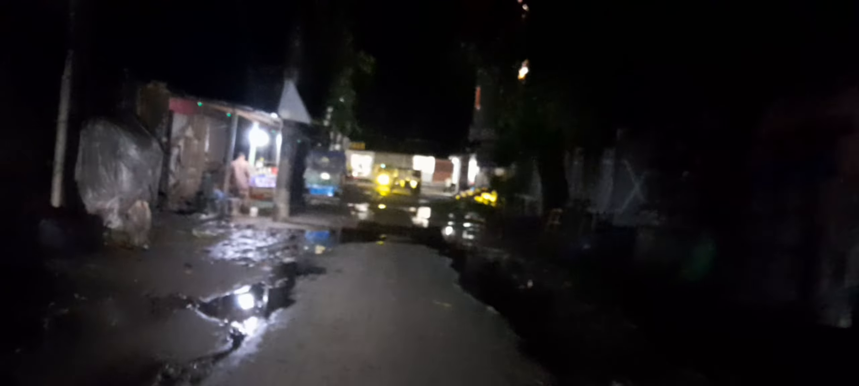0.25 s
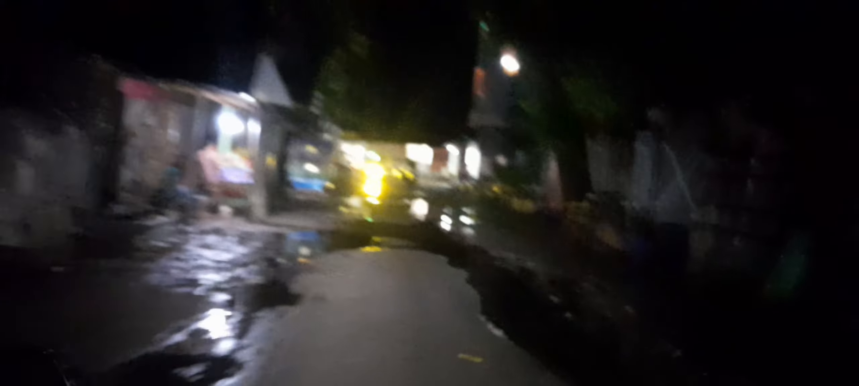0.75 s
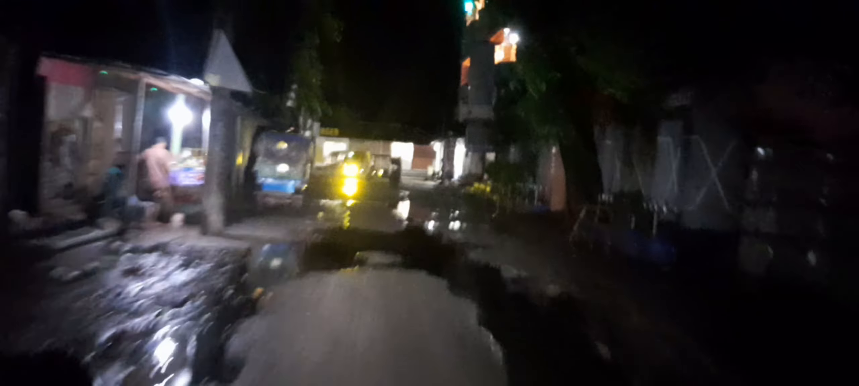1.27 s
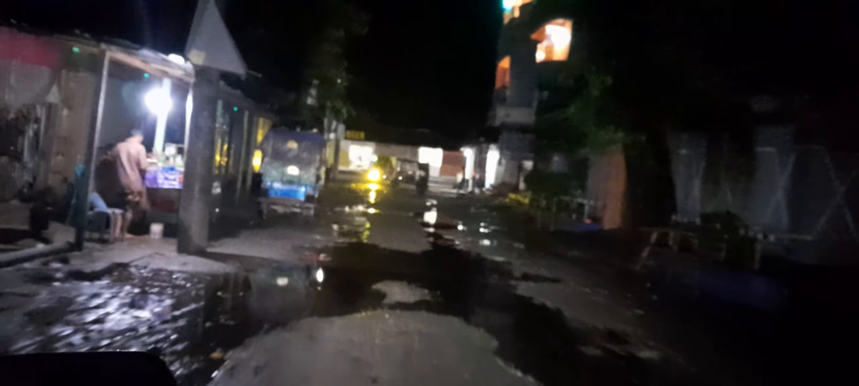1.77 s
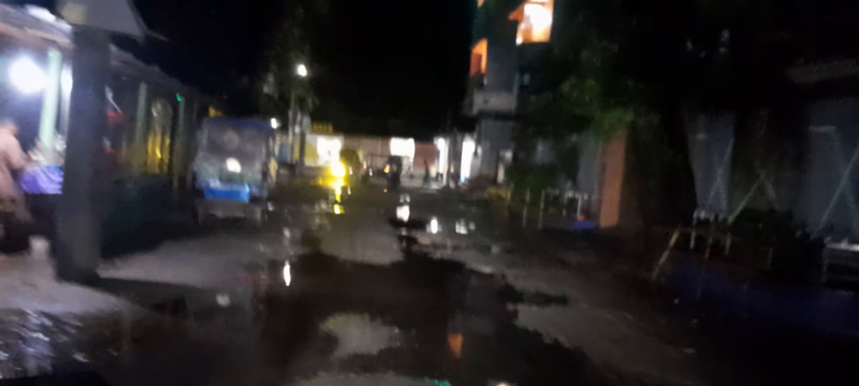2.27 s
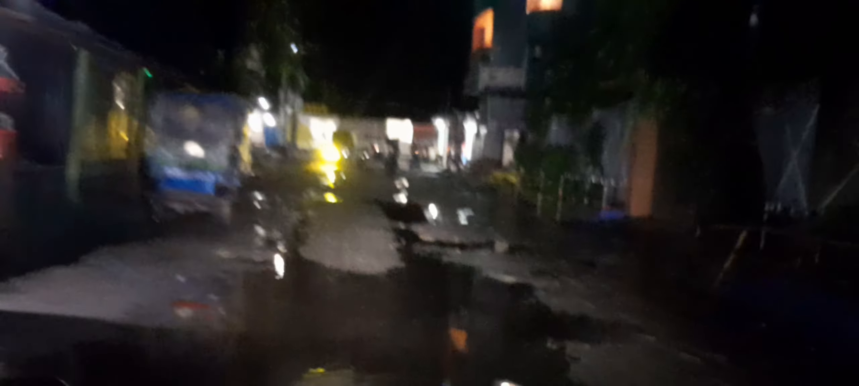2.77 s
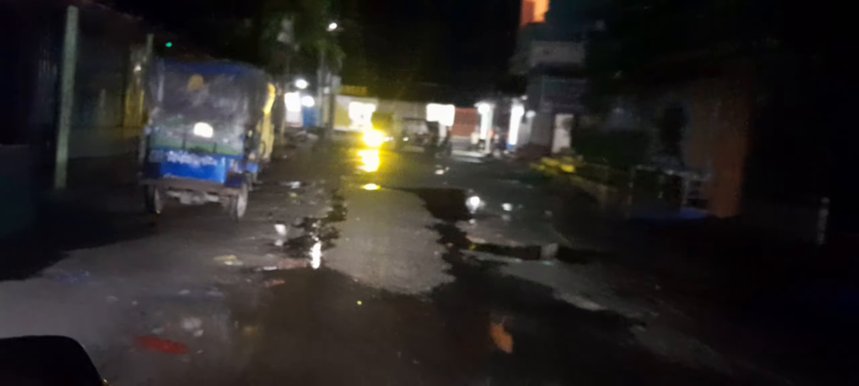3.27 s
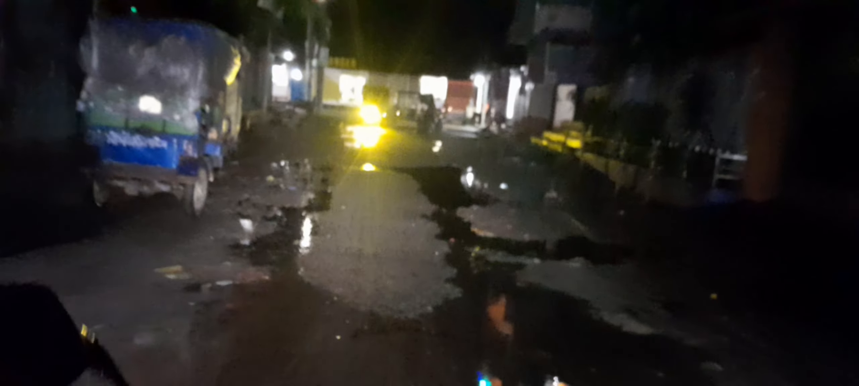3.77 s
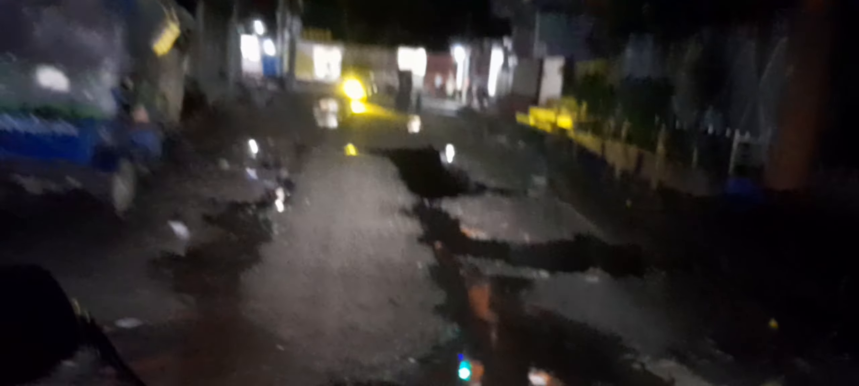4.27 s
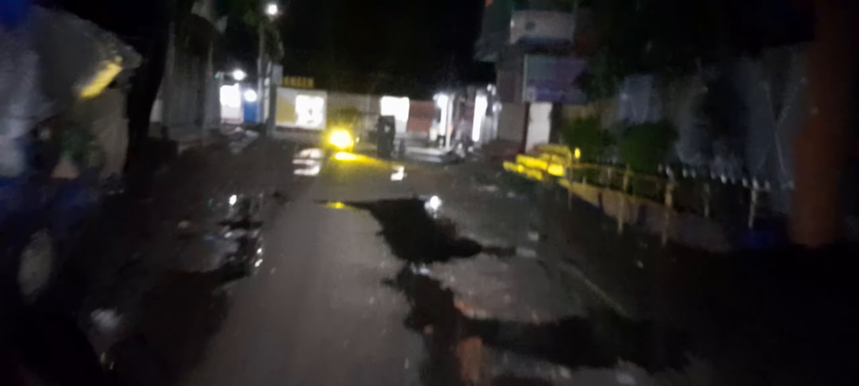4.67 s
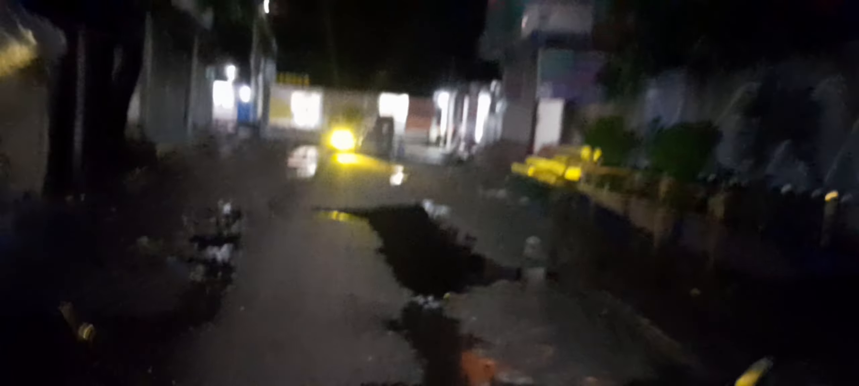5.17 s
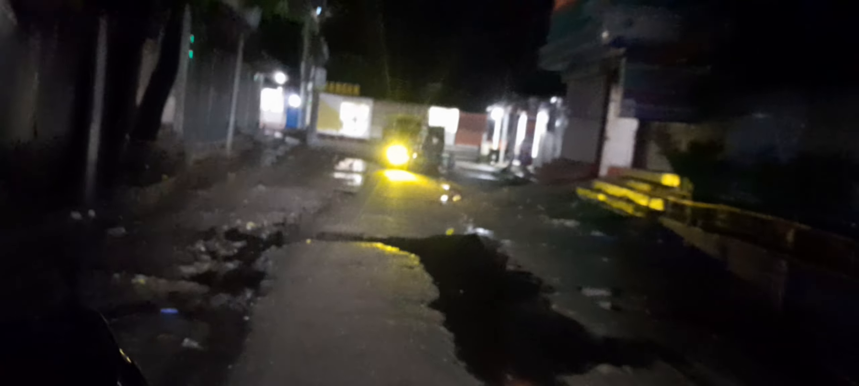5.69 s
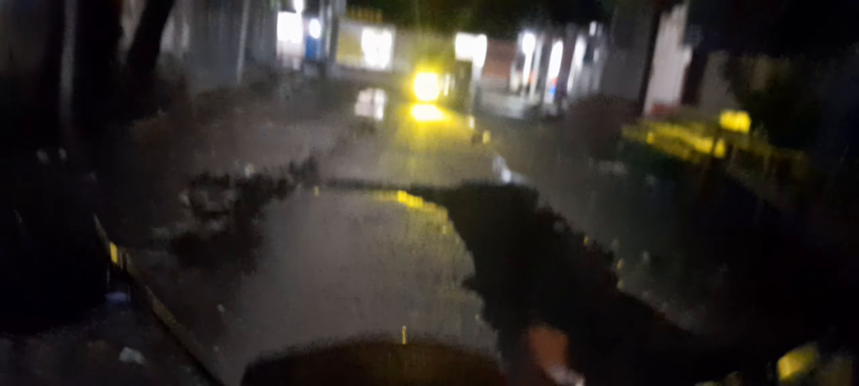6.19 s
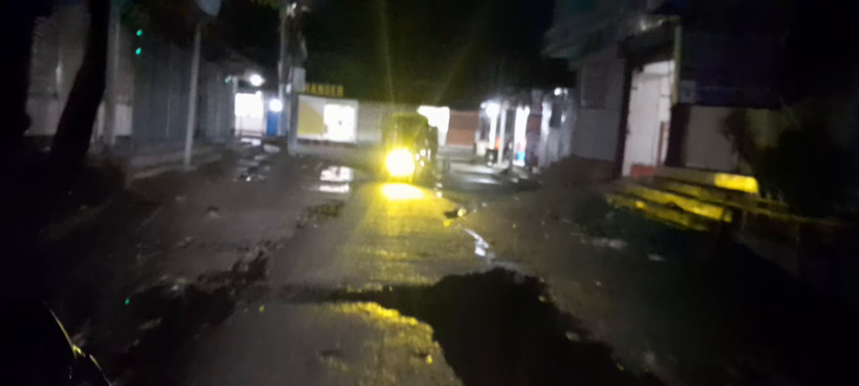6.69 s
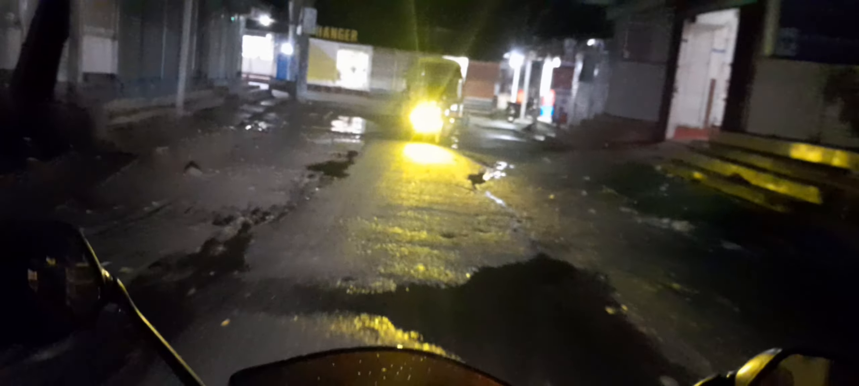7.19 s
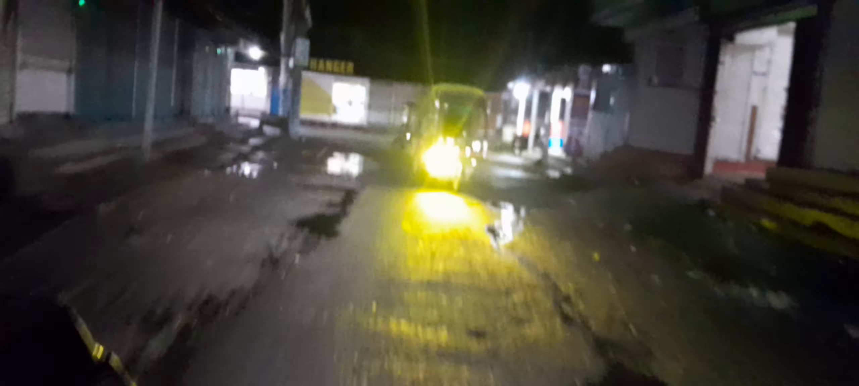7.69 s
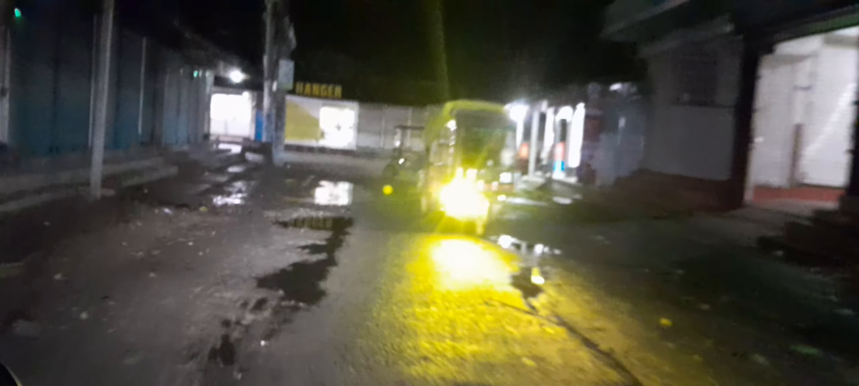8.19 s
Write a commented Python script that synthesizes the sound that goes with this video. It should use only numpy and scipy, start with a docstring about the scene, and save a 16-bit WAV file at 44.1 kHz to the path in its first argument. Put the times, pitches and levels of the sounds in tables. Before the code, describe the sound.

Onboard a small motorcycle: throbbing exhaust, raspy intake and wet hiss, a sharp crack, pothole thuds and rattles, slowing, then revving with a thin squeal.

```python
"""A single-cylinder motorcycle rolls along a wet, bumpy street: shaped noise makes the hiss, rumble and clatter.
At once each firing thumps in the silencer, the intake rasps, gears whine and the chain moans. A crack and its
echo ring out, then potholes jolt the bike, the fairing knocks, the intake whistles and grit ticks.
The engine drops to idle after two seconds and picks up again after four.
Past six seconds a metal part squeals as a wavering tone, joined by a rough chirr of ringing noise."""
import sys
import numpy as np
from scipy import signal
from scipy.fft import rfft, irfft, next_fast_len
from scipy.io import wavfile

SR = 44100
rng = np.random.default_rng(int(sys.argv[2]) if len(sys.argv) > 2 else 0)


def dump_mix(stems):
    """Bounce the given channels to the path in sys.argv[1] as a 16-bit WAV at rate SR."""
    frames = np.atleast_2d(stems).T  # one column per channel
    limited = np.clip(frames, -1, 1)  # hard clip at full scale
    pcm = np.round(limited * 32767).astype(np.int16)
    wavfile.write(sys.argv[1], SR, pcm)


N = 372233
TIME = np.arange(N) / SR   # seconds

# How fast the engine runs: (time [s], speed [firings per s])
ENGINE_SPEED = [(0.0, 20.21), (0.37, 20.48), (0.5, 16.6), (0.87, 15.7), (1.01, 24.6), (1.12, 21.2),
                (1.38, 21.0), (1.75, 15.32), (2.02, 16.23), (2.59, 8.04), (2.9, 10.26), (3.17, 8.78),
                (3.8, 8.82), (4.06, 13.95), (4.93, 16.39), (5.09, 13.71), (5.51, 15.4), (5.93, 13.05),
                (6.25, 23.2), (6.45, 20.8), (6.92, 21.0), (7.08, 23.3), (7.25, 24.5), (7.45, 25.1),
                (7.84, 17.3), (8.2, 14.07), (8.44, 15.0)]
# The rider's hand: (time [s], throttle opening [0-1])
THROTTLE = [(0, 0.56), (.35, 0.42), (.58, 0.09), (.8, 0.56), (1.02, 0.54), (1.38, 0.53), (1.7, 0.37),
            (2.25, 0.17), (2.75, 0.05), (3.2, 0.12), (3.5, 0.58), (3.97, 0.34), (4.3, 0.9), (4.85, 0.81),
            (5.38, 0.83), (5.7, 0.41), (6, 0.52), (6.22, 0.82), (6.85, 0.87), (7.38, 0.74), (8.05, 0.58),
            (8.44, 0.83)]
# Jolts from the road: (time [s], bounces [count], relative thud [dB], relative rattle [dB],
# pitch of the shaken panel [Hz], left over right [dB])
JOLTS = [(0.312, 1, -15.5, -25, 200, -1), (0.337, 2, -19, -27, 260, -15), (.402, 2, -13, -26, 200, -10.5),
         (0.941, 1, -39, -29, 290, 1), (.982, 1, -29, -30, 286, 3), (1.544, 2, -11.5, -23.5, 270, -0.5),
         (1.564, 1, -24, -34, 450, 1), (1.601, 1, -25, -29, 260, 15), (1.694, 1, -29, -34, 220, 12),
         (1.745, 1, -38, -39, 240, 18), (1.799, 1, -40, -29, 440, 13), (1.824, 2, -18.5, -28, 403, 13),
         (1.867, 1, -33, -22.5, 550, 5.5), (1.92, 1, -28, -25.5, 380, 3), (1.95, 1, -40, -32, 343, -4),
         (1.99, 1, -26, -32, 220, -11), (2.035, 1, -30, -35, 600, -2), (2.118, 1, -29, -36, 220, 9),
         (2.4, 1, -30, -34, 190, 4), (2.422, 1, -30, -28, 198, 0.5), (2.63, 2, -33, -37.5, 262, 1),
         (3.282, 1, -29, -33, 260, -4), (4.062, 1, -17.5, -40, 446, -1), (4.249, 1, -15, -36, 290, -3),
         (4.274, 2, -39, -23, 308, 1), (4.652, 1, -27, -37, 574, -3), (4.89, 1, -18, -29, 260, 1),
         (5.088, 1, -28, -28.5, 425, 2), (7.534, 1, -17, -48, 250, 1), (7.569, 1, -14.5, -48, 250, 0),
         (7.609, 1, -10.5, -42, 250, 0)]
# Knocks on the fairing: (time [s], relative clack [dB], relative ring [dB], left over right [dB])
KNOCKS = [(.351, -34, -60, -3), (0.983, -28, -47, 3), (1.552, -30, -52, 0), (1.602, -27.5, -55, -5),
          (1.629, -33, -52, -2), (1.773, -31.5, -58, -2), (1.813, -38, -55, -3), (1.865, -28.5, -45, 2),
          (1.919, -20, -55, -3.5), (2.424, -33, -57, 0), (4.071, -30.5, -45, 4), (4.17, -29, -45, 3),
          (4.28, -27.5, -41, 2), (4.652, -25, -37, 2), (5.085, -30, -45, 0), (7.605, -21.5, -25, 7)]
# A crack in the street and its echo: (time [s], relative snap [dB], relative tail [dB])
CRACKS = [(0.222, -15, -21), (0.453, -28.5, -39.5)]
# Ticks of grit and loose parts: (time [s], relative level [dB], centre of their colour [Hz])
TICKS = [(1.543, -59, 5000), (2.978, -53, 4100), (3.385, -49.5, 2340), (4.279, -51, 5000),
         (5.078, -47, 4500), (5.68, -40, 3380), (6.281, -39.5, 2445), (6.295, -41, 5170),
         (7.733, -41.5, 3900)]
# Swells and sags of the exhaust note: (time of peak [s], half length [s], level change [dB])
EXHAUST_SWELLS = [(.59, .07, -1), (.8, 0.18, 4.5), (1.0, .08, -4), (1.307, 0.2, 4), (1.733, 0.064, -17),
                  (2.866, 0.12, -14), (3.17, 0.082, -12), (3.53, .06, 3), (3.778, 0.056, 3.5),
                  (4.425, 0.1, 7), (4.81, 0.083, 6.5), (5.035, .06, -1), (5.315, .09, 1.5),
                  (5.99, 0.057, -12), (6.192, 0.046, -16), (6.718, 0.53, -7), (8.082, 0.074, -8),
                  (8.264, .12, -0.5)]
# Moan of the chain: (time [s], pitch [Hz], relative level [dB])
CHAIN_MOAN = [(0, 540, -44), (.33, 540, -41), (.5, 540, -100), (4.0, 643, -100), (4.15, 650, -55),
              (4.3, 661, -37.5), (4.55, 641, -40.5), (4.77, 700, -39.5), (4.96, 658, -37.5),
              (5.1, 590, -41.5), (5.45, 575, -42), (5.62, 475, -41), (5.8, 455, -36), (5.95, 520, -45.5),
              (6.2, 505, -42), (6.35, 500, -54), (6.5, 500, -100), (7.65, 520, -100), (7.85, 520, -43.5),
              (8.44, 540, -41)]
# Air whistling past the throttle: (time of peak [s], half length [s], pitch at peak [Hz], relative level [dB])
WHISTLES = [(0.756, .13, 1416, -44.5), (1.002, .08, 1320, -38), (1.09, .07, 1380, -41),
            (1.284, .12, 1406, -43.5), (6.11, .08, 1407, -40), (6.245, .08, 1336, -37),
            (6.435, .07, 1325, -34.5), (6.599, .12, 1313, -36.5), (7.877, .12, 1350, -53)]
# Drones of the frame: (time of peak [s], half length [s], multiple of firing rate [count], level [dB])
DRONES = [(.95, 0.075, 13, -28), (1.33, 0.23, 13, -32.5), (6.296, 0.15, 12, -29), (7.27, 0.34, 12, -28)]
# Steady hum of the frame: (multiple of firing rate [count], relative level [dB])
HUM = [(5, 4.5), (4, -20), (6, -8.5)]
# Loudness of the wet hiss: (time [s], relative level [dB])
HISS_LEVEL = [(0, -37.5), (.2, -38), (.55, -46), (1.02, -38.5), (2.05, -48), (2.7, -51), (3.32, -46.5),
              (3.42, -44.5), (3.95, -45), (4.3, -40), (5.38, -38), (5.95, -42.5), (6.27, -35), (7.4, -36.5),
              (8.05, -40), (8.44, -38.5)]
# Loudness of the squealing metal part: (time [s], relative level [dB])
SQUEAL_LEVEL = [(6.2, -100), (6.33, -50), (6.42, -38.5), (6.59, -48), (6.68, -35), (6.74, -45), (6.84, -34),
                (6.9, -45), (7.0, -29.5), (7.06, -42), (7.17, -47), (7.3, -64), (7.45, -100)]
# Tones of the squeal: (pitch [Hz], relative level [dB])
SQUEAL_MODES = [(3268, -0.5), (2750, -17)]

# Resonances of the silencer, airbox, engine casing, fairing and chirring part:
# (pitch [Hz], width [Hz], relative level [dB])
SILENCER = [(102.3, 44.7, 6), (79.5, 13, -18)]
AIRBOX = [(954, 74, 10.3), (1134, 180, 10), (1318, 198, 7.4), (1385, 440, 1)]
BLOCK_MODES = [(295.6, 75, 3), (477, 115, -0.5), (683, 82, -4.5)]
FAIRING = [(1188, 50, 5.5)]
CHIRR_MODES = [(2870, 140, -0.69), (3030, 120, 5.8), (3430, 400, -2)]

# Noise colours of exhaust rumble, casing clatter, wet hiss, jolt rattle, crack tail (also used for grit),
# crack snap, fairing clack and background: (pitch [Hz], relative level [dB per Hz])
RUMBLE = [(20, -17), (32, -43), (45, 11.5), (70, 18), (110, 16), (150, 14.5), (300, -49)]
BLOCK = [(100, -54), (170, 5.5), (220, 3.5), (300, 3.5), (390, -1), (520, -1), (630, -16), (740, -9),
         (860, -14.5), (1400, -12), (1900, -45), (4000, -71)]
HISS = [(700, 6.5), (1600, 5.5), (2400, 4), (3000, 5), (3700, 8), (4500, 5), (6200, 4), (7500, 3),
        (8400, -8), (11000, -8.5), (13000, -5.5), (16000, -13)]
RATTLE = [(30, -9), (60, 12), (150, 9.5), (210, 8.5), (320, 0), (520, -5), (800, -12.5), (1300, -32),
          (2000, -39), (6000, -65)]
CRACK_TAIL = [(400, -37), (900, -14), (1500, 0), (2400, 3.5), (3200, -0.5), (4400, 5.5), (6200, 5.5),
              (7500, 3), (8600, -7.5), (12000, -10.5), (16000, -20)]
SNAP = [(300, -8), (700, -4), (1500, -25), (2400, 5.5), (3200, -15), (4400, 6), (6200, 5), (7500, 2),
        (8600, -5), (12000, -6), (16000, -5)]
CLACK = [(150, -13), (400, 5), (700, 5), (1200, -0.5), (1800, -13), (3400, -21), (8000, -37)]
BACKGROUND = [(20, -15), (45, 9.5), (80, 3), (200, -9), (400, -21), (1500, -37), (8000, -33.5),
              (16000, -30)]
# How the gear case colours the whine: (pitch [Hz], relative level [dB])
GEAR_CASE = [(400, -18), (640, -4), (800, -12), (905, -11), (938, 0), (1040, -2), (1120, 7.5)]
# How alike the two ears are: (pitch [Hz], likeness [-1 to 1])
LIKENESS = [(30, -0.17), (100, 0.79), (170, 0.16), (300, 0.86), (700, 0.46), (1300, 0.68), (2200, 0.0013),
            (16000, -0.083)]

CRUISE_PER_S = 20   # firings per second at which engine parts have their base level
GEAR_MULTIPLE = 45   # whine cycles per firing
HUM_FULL_PER_S, HUM_LOSS_DB = 23.66, 1   # below this many firings/s, dB lost per firing/s
BOUNCE_S, BOUNCE_LOSS_DB = .026, 2.5   # gap between bounces, loss from each to the next
CHIRR_START_S, CHIRR_END_S, CHIRR_FADE_S = 6.9, 7.62, 0.2
WHISTLE_FALL_HZ_PER_S = 250
WAVER_APART = 0.43   # share of a tone's blur that differs between the ears
CUTOFF_HZ = 15800


def from_db(db):
    """Turn decibels into a multiplying gain."""
    return 10 ** (np.asarray(db) / 20)


def rms_one(x):
    """Scale a sound to an average strength (rms) of 1."""
    return x / np.sqrt(np.mean(x ** 2) + 1e-20)


def in_time(rows):
    """Join the points of each table column by straight lines, sample by sample."""
    seconds, *columns = np.transpose(rows)
    return [np.interp(TIME, seconds, column) for column in columns]


def at_hz(points, hz):
    """Read a colour table at any pitch, joining its points on a log-pitch axis."""
    table_hz, values = np.array(points).T
    return np.interp(np.log(hz + 1), np.log(table_hz), values)


def panned(left_over_right_db):
    """Left and right gains for a level difference."""
    return from_db(np.array([[left_over_right_db], [-left_over_right_db]]) / 2)


def noise(spectrum=((100, 0), (1000, 0))):
    """Stereo noise of a given colour, as alike in both ears as LIKENESS says; rms 1."""
    length = next_fast_len(N)
    hz = np.fft.rfftfreq(length, 1 / SR)
    mid, side = rfft(rng.standard_normal((2, length)))
    alike = np.clip(at_hz(LIKENESS, hz), -1, 1)
    both = np.sqrt(1 + alike) * mid + np.sqrt(1 - alike) * side * [[1], [-1]]
    coloured = both * from_db(at_hz(spectrum, hz))
    return rms_one(irfft(coloured)[:, :N])


def drift(per_s):
    """A random wandering curve with per_s new points a second; rms 1."""
    points = rng.standard_normal(size=4000)
    return rms_one(np.interp(TIME * per_s, np.arange(len(points)), points))


def resonate(x, modes, order=1):
    """Ring a sound through side-by-side resonances; a higher order makes their flanks steeper."""
    out = 0
    for hz, width, db in modes:
        r = np.exp(-np.pi * width / SR)   # a wider resonance dies away sooner
        section = [(1 - r * r) / 2, 0, (r * r - 1) / 2, 1, -2 * r * np.cos(2 * np.pi * hz / SR), r * r]
        out = out + from_db(db) * signal.sosfilt([section] * order, x + 1e-18)
    return out


def clicks(times, sizes):
    """Blows that each last one sample."""
    out = np.zeros(N)
    places = np.clip((np.asarray(times) * SR).astype(int), 0, N - 1)
    np.add.at(out, places, sizes)
    return out


def fade(x, seconds):
    """Let each click die away exponentially from its own height."""
    return signal.lfilter([1], [1, -np.exp(-1 / (seconds * SR))], x + 1e-18)


def swell(x, seconds):
    """Let each click swell to its own height within the given time, then die away."""
    return fade(fade(x, seconds), seconds) * np.e / (seconds * SR)


def hump(peak_s, half_s):
    """A straight rise to 1 and an equal fall."""
    return np.maximum(1 - np.abs(TIME - peak_s) / half_s, 0)


def arch(peak_s, half_s):
    """A rounded swell to 1 and back."""
    return np.sin(np.pi / 2 * hump(peak_s, half_s))


def strokes(speed, place, uneven_db):
    """One uneven click per firing cycle at a given share of it; faster clicks are weaker, to keep mean power."""
    cycles = np.cumsum(speed) / SR - place
    at = np.flatnonzero(np.diff(np.floor(cycles)))
    uneven = from_db(uneven_db * rng.standard_normal(400)[:len(at)])
    return clicks(at / SR, uneven / np.sqrt(speed[at]))


def throb(pulses, seconds, steady):
    """A gate that opens at each pulse and never quite shuts; rms 1."""
    opening = rms_one(swell(pulses, seconds))
    return rms_one(np.sqrt(opening ** 2 + steady ** 2))


def waver(hz, rough, per_s):
    """A tone blurred at random in level and phase, a little differently in each ear; rms 1."""
    shared, apart = (drift(per_s) + 1j * drift(per_s) for _ in range(2))
    blur = 1 + rough * (shared + WAVER_APART * apart * np.array([[1], [-1]]))
    turning = np.exp(2j * np.pi * np.cumsum(hz + np.zeros(N)) / SR)
    return rms_one(np.real(blur * turning))


def engine_db(speed, throttle, base_db, octave_db, throttle_db):
    """Level from speed (per doubling) and throttle (full opening), above the base at cruise, throttle shut."""
    return base_db + octave_db * np.log2(speed / CRUISE_PER_S) + throttle_db * throttle


def crank_angle(speed):
    """Angle of the firing cycle, one full turn per firing [radians]."""
    return 2 * np.pi * (np.cumsum(speed) / SR - 1 / 4)


def exhaust(firing, level_db):
    """Each firing rings the silencer and lets out a burst of low rumble."""
    thump = rms_one(resonate(firing, SILENCER, order=3))
    # a late copy, opposite in the two ears, makes the thump wider
    late = np.interp(TIME - .0024, TIME, thump)
    thump = thump + 0.26 * late * np.array([[-1], [1]])
    rumble = noise(RUMBLE) * throb(firing, seconds=.012, steady=1.0)
    return from_db(level_db) * (from_db(-2.0) * thump + from_db(-1.5) * rumble)


def block(speed, firing, level_db):
    """The engine casing clatters twice per firing cycle and rings in its modes, more so at speed."""
    blows = firing + .7 * strokes(speed, place=.9, uneven_db=2)
    gate = throb(blows, seconds=0.0057, steady=1.34)
    clatter = noise(BLOCK) * gate
    ring = rms_one(resonate(noise() * gate, BLOCK_MODES, order=2)) * (speed / 20) ** 0.71
    return from_db(level_db) * (from_db(-2.0) * clatter + from_db(-5.5) * ring)


def intake(speed, level_db):
    """Gulps of air ring the airbox and rasp through its resonances."""
    gulps = strokes(speed, place=.03, uneven_db=2)
    breath = noise() * throb(gulps, seconds=0.013, steady=0.58)
    rasp = rms_one(resonate(breath, AIRBOX, order=2))
    ring = rms_one(resonate(gulps, AIRBOX, order=2)) * (speed / 22) ** 2
    return from_db(level_db) * (from_db(-3.0) * rasp + from_db(-9.5) * ring) * panned(2.3)


def chain(firing):
    """The chain gives a rough, gliding moan, tugged by every firing."""
    hz, db = in_time(CHAIN_MOAN)
    moan = waver(hz, rough=3, per_s=220)
    tug = throb(firing, seconds=0.0095, steady=0.87)
    return from_db(db) * moan * tug * panned(1.0)


def frame_hum(speed, throttle):
    """The frame hums at multiples of the firing rate, loudest at high revs and softer with more throttle."""
    level_db = -28.5 - 7 * throttle - HUM_LOSS_DB * np.maximum(HUM_FULL_PER_S - speed, 0)
    angle = crank_angle(speed)
    hum = sum(from_db(db + 0.34 * drift(4.0)) * np.cos(multiple * angle) for multiple, db in HUM)
    return from_db(level_db) * hum


def gear_whine(speed, level_db):
    """Meshing gear teeth whine at a multiple of the firing rate, coloured by the gear case."""
    mesh_hz = GEAR_MULTIPLE * speed
    # uneven turning of the crank blurs the whine into a rasp at low speed
    rough = .68 * np.minimum((24 / speed) ** 2, 4)
    whine = from_db(at_hz(GEAR_CASE, mesh_hz)) * waver(mesh_hz, rough, per_s=130)
    # the load on the teeth swells once per cycle, starting just before the firing
    load = throb(strokes(speed, place=.15, uneven_db=2), seconds=.012, steady=.7)
    return from_db(level_db) * whine * load * panned(3.2)


def hiss(speed):
    """Wet tyres and gears hiss; two valves tick faintly in every cycle."""
    level_db, = in_time(HISS_LEVEL)
    valves = strokes(speed, place=.1, uneven_db=1.5) + strokes(speed, place=.6, uneven_db=1.5)
    gate = throb(valves, seconds=0.0029, steady=2.55) * from_db(1.21 * drift(29))
    return from_db(level_db) * noise(HISS) * gate * panned(1.3)


def background():
    """Steady noise gives a road rumble and a faint hiss."""
    return from_db(-42.5) * noise(BACKGROUND)


def cracks():
    """A short bright snap, then a ragged tail of reflections between the house fronts."""
    seconds, snap_db, tail_db = np.transpose(CRACKS)
    snap = swell(clicks(seconds, from_db(snap_db)), seconds=0.004)
    tail = fade(clicks(seconds, from_db(tail_db)), seconds=0.099) * from_db(0.95 * drift(278))
    return (snap * noise(SNAP) + tail * noise(CRACK_TAIL)) * panned(2.5)


def jolts():
    """Each pothole thuds through the frame and rattles a plastic panel, in one bounce or two weakening ones."""
    out = 0
    grain = noise(RATTLE) * from_db(4.1 * drift(200))
    for start_s, count, thud_db, rattle_db, panel_hz, side_db in JOLTS:
        k = np.arange(count)
        bounces = clicks(start_s + k * BOUNCE_S, from_db(-k * BOUNCE_LOSS_DB))
        # the high gain makes up for how little of a one-sample blow gets through
        thud = resonate(bounces, [(83.7, 48, 50.6)], order=2)
        panel = rms_one(resonate(grain, [(panel_hz, 264, 0)], order=2))
        shake = swell(bounces, seconds=.008)
        rattle = shake * (from_db(2) * grain + from_db(-6) * panel)
        out = out + (from_db(thud_db) * thud + from_db(rattle_db) * rattle) * panned(side_db)
    return out


def knocks():
    """Each knock is a dry clack of plastic that also rings the fairing, some more than others."""
    out = 0
    grain = noise(CLACK)
    for start_s, clack_db, ring_db, side_db in KNOCKS:
        blow = clicks([start_s], 0.84)
        clack = swell(blow, seconds=.0035) * grain
        ring = resonate(blow, FAIRING, order=2)
        out = out + (from_db(clack_db) * clack + from_db(ring_db + 53) * ring) * panned(side_db)
    return out


def exhaust_swells_db():
    """Exhaust level gained or lost while the note swells or sags."""
    return sum(db * hump(peak_s, half_s) for peak_s, half_s, db in EXHAUST_SWELLS)


def whistles():
    """Air past the throttle gives short, breathy whistles that fall in pitch."""
    out = 0
    for peak_s, half_s, hz, db in WHISTLES:
        falling_hz = hz - WHISTLE_FALL_HZ_PER_S * np.clip(TIME - peak_s, -half_s, half_s)
        out = out + from_db(db) * hump(peak_s, half_s) * waver(falling_hz, rough=2, per_s=210)
    return out * panned(2.9)


def frame_drones(speed):
    """Now and then the frame drones at one multiple of the firing rate, swelling and sinking."""
    angle = crank_angle(speed)
    return sum(from_db(db) * arch(peak_s, half_s) * np.cos(multiple * angle)
               for peak_s, half_s, multiple, db in DRONES)


def grit_ticks():
    """Grit and loose parts tick: short fading bursts of noise, each with its own ringing colour."""
    out = 0
    grit = noise(CRACK_TAIL)
    for start_s, db, hz in TICKS:
        tick = fade(clicks([start_s], from_db(db)), seconds=0.016) * grit
        out = out + from_db(2) * tick + resonate(tick, [(hz, 370, 18)])
    return out


def squeal():
    """A metal part squeals in two wavering tones inside a skirt of rubbing noise."""
    level_db, = in_time(SQUEAL_LEVEL)
    tones = sum(from_db(db) * waver(hz, rough=.7, per_s=140) for hz, db in SQUEAL_MODES)
    skirt = rms_one(resonate(noise(), [(3260, 380, 0)], order=2))
    return from_db(level_db) * (tones + from_db(-7) * skirt)


def chirr():
    """As the squeal dies, noise of flickering level rings as a rough chirr."""
    held = np.clip(np.minimum(TIME - CHIRR_START_S, CHIRR_END_S - TIME) / CHIRR_FADE_S, 0, 1)
    rough = rms_one(resonate(noise(), CHIRR_MODES, order=2) * from_db(3 * drift(35)))
    return from_db(-43) * held * rough


def scene():
    """Engine, road and street together; speed and throttle help set the level of the engine parts."""
    speed, = in_time(ENGINE_SPEED)
    throttle, = in_time(THROTTLE)
    exhaust_db = engine_db(speed, throttle, base_db=-34, octave_db=3.5, throttle_db=8) + exhaust_swells_db()
    block_db = engine_db(speed, throttle, base_db=-36.5, octave_db=3.5, throttle_db=8.5)
    intake_db = engine_db(speed, throttle, base_db=-55, octave_db=5, throttle_db=23.5)
    whine_db = engine_db(speed, throttle, base_db=-55.5, octave_db=9, throttle_db=23.5)
    firing = strokes(speed, place=.19, uneven_db=1.2)
    engine = exhaust(firing, exhaust_db) + block(speed, firing, block_db) + intake(speed, intake_db)
    drive = chain(firing) + frame_hum(speed, throttle) + gear_whine(speed, whine_db) + frame_drones(speed)
    road = hiss(speed) + background() + jolts() + knocks()
    loose_parts = grit_ticks() + squeal() + chirr()
    return engine + drive + road + cracks() + whistles() + loose_parts


def record(dry):
    """Cut the highest treble off steeply."""
    lowpass = signal.ellip(10, .2, 80, CUTOFF_HZ, fs=SR, output="sos")
    return signal.sosfilt(lowpass, dry)


dry = scene()
out = record(dry)
dump_mix(out)
```